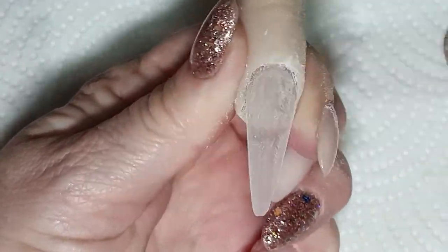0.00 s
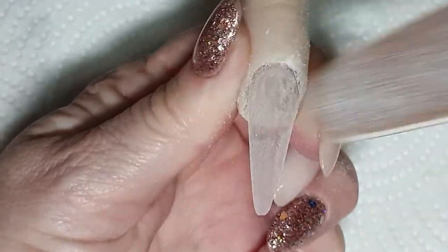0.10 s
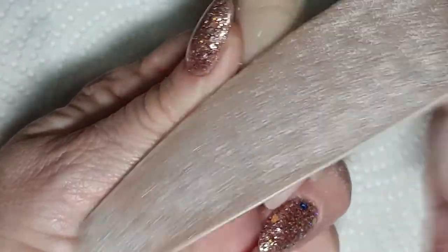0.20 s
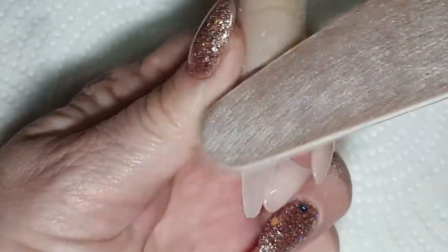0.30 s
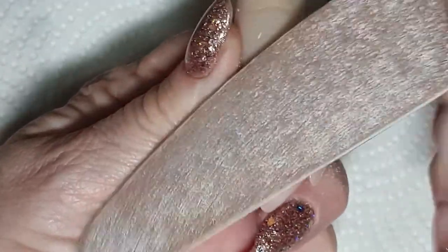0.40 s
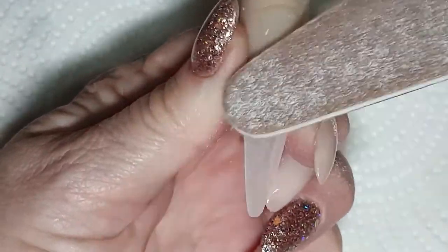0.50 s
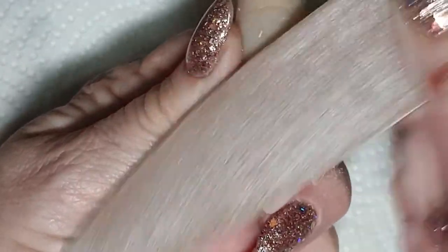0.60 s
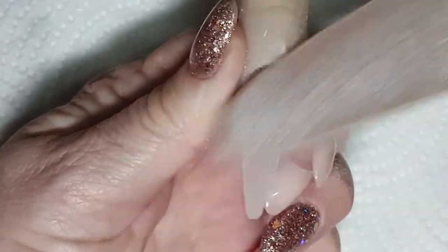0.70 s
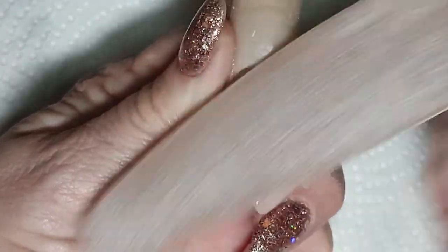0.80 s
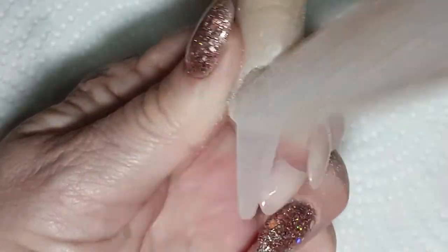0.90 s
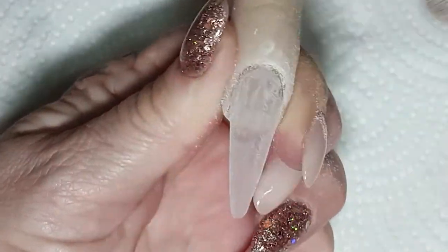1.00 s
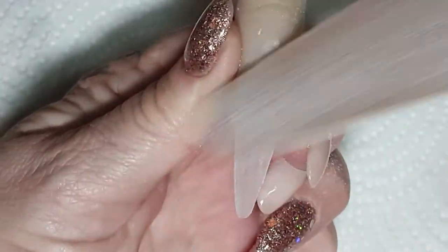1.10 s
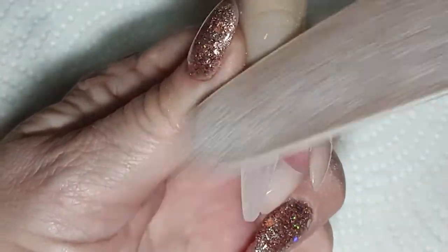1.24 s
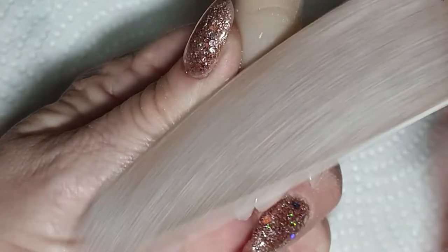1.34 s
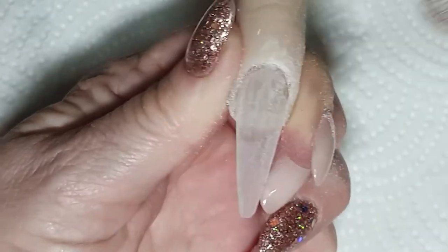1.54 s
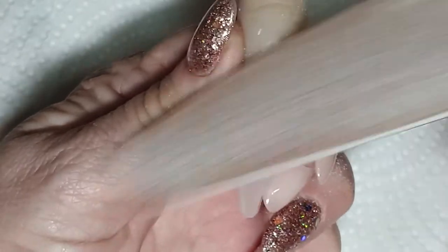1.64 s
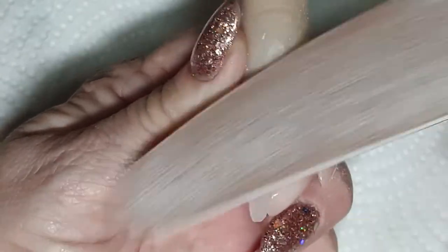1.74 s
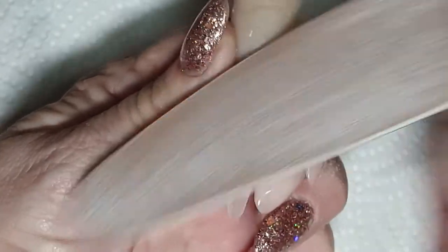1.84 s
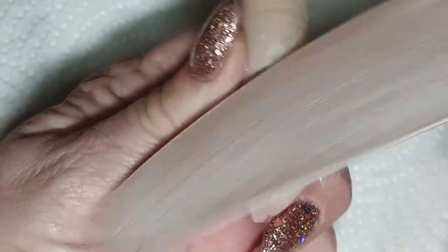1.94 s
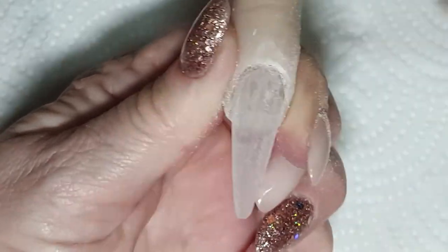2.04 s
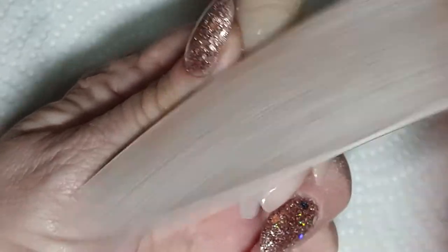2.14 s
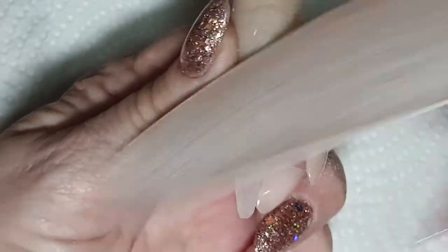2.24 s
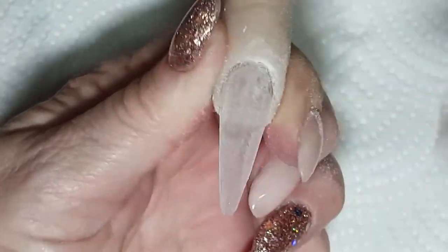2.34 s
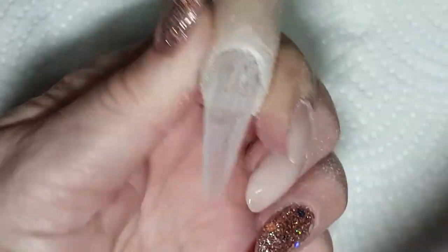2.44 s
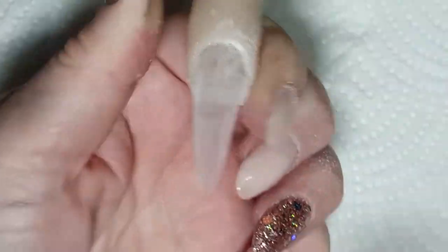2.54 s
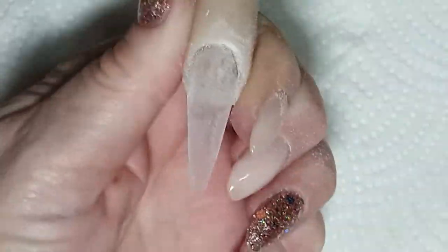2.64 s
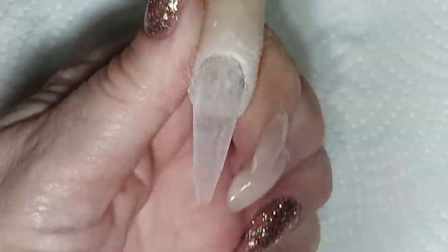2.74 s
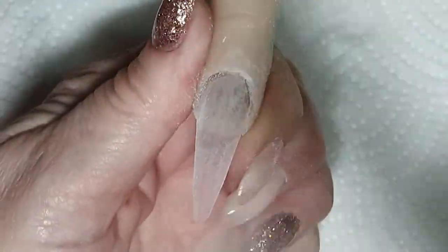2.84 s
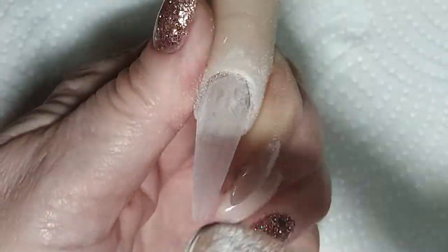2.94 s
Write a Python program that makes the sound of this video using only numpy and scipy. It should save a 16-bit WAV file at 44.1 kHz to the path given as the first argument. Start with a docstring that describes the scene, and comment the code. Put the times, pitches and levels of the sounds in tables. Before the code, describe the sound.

Close, bright, gritty nail filing in short fast bursts, ending with tiny clicks and a light sweep

```python
"""Small room, microphone close: a hand file rasps back and forth over a hard artificial nail.
Grit catches hiss and ring nail and blade; the file judders against the finger (low noise).
The end of a stroke opens; four bursts of strokes follow, then small clicks and two light sweeps.
Clicks are noise snaps through two resonances; a wavering hum, handling rumble and air lie beneath."""
import sys
import numpy as np
from scipy import signal
from scipy.fft import rfft, irfft, next_fast_len
from scipy.io import wavfile
from scipy.ndimage import uniform_filter1d

SR = 44100
rng = np.random.default_rng(int(sys.argv[2]) if len(sys.argv) > 2 else 0)


def materialize(psi):
    """Save the field psi as 16-bit PCM at rate SR to the path in sys.argv[1].

    A 1-D psi becomes a single channel; in a 2-D psi each row is a channel.
    """
    bounded = np.clip(np.atleast_2d(psi).T, -1, 1)
    quanta = np.round(bounded * 32767).astype(np.int16)
    wavfile.write(sys.argv[1], SR, quanta)


N = 130095

# Low hum contour before trims: (time [s], level [dB])
HUM_CONTOUR = [(0.0, -44), (0.08, -58.5), (0.48, -49), (0.53, -67), (0.94, -52), (1.11, -67), (1.32, -47),
               (1.4, -70), (1.73, -50), (2.13, -85), (2.22, -57), (2.95, -80)]
# Noise part of the hum: (frequency [Hz], relative gain [dB])
DRONE_SPECTRUM = [(20, -5), (40, -33), (58, 5), (75, -4), (110, -1), (250, -42.5)]
# Handling rumble contour before trim: (time [s], level [dB])
RUMBLE_CONTOUR = [(0.0, -47), (0.17, -73), (0.22, -52.5), (0.68, -52.5), (0.78, -44), (0.83, -51),
                  (0.98, -43.5), (1.1, -60), (1.78, -46), (1.83, -57.5), (2.05, -54.5), (2.17, -69),
                  (2.32, -51), (2.4, -53.5), (2.6, -49), (2.95, -54)]
# Handling rumble: (frequency [Hz], relative gain [dB])
RUMBLE_SPECTRUM = [(25, -29), (60, -2), (85, -8.5), (115, 7.5), (160, 0), (210, -9), (300, -3),
                   (500, -16.5), (1200, -28)]
# Room air: (frequency [Hz], relative gain [dB])
AIR_SPECTRUM = [(30, -12), (300, -2), (700, -25), (2000, -36), (8000, -20), (16000, -49)]
# Small hard clicks: (time [s], decay time constant [s], low-ring drive [dB], high-ring drive [dB])
CLICK_EVENTS = [(2.447, 0.0041, -36, -22), (2.4495, 0.0024, -20.5, -17), (2.453, .0008, -27, -23),
                (2.4697, 0.00063, -21, -41), (2.4827, 0.00073, -15.5, -19.5)]
# Light sweeps over the nail: (start [s], fastest [s], end [s], hiss level [dB], body level [dB])
LIGHT_SWEEPS = [(2.563, 2.629, 2.678, -31, -46.5), (2.646, 2.777, 2.94, -51, -65)]
# Sweep hiss: (frequency [Hz], relative gain [dB])
SWEEP_SPECTRUM = [(600, -17), (1400, -15.5), (2400, -10), (4000, -3.5), (8000, 0.5), (12000, -4),
                  (16000, -2.5)]
# File strokes, levels before speed and chatter: (start [s], fastest [s], end [s], landing speed [0-1],
# hiss level [dB], nail ring level [dB], nail ring frequency [Hz], blade level [dB], judder level [dB])
FILE_STROKES = [ (-.06, 0, 0.066, 0., -54, -46.5, 6500, -56.5, -61.5),
                (0.182, 0.236, 0.26, 0.32, -36, -36.5, 7040, -48.5, -49),
                (0.264, 0.326, 0.35, 0.04, -37.5, -36, 6100, -42.5, -41.5),
                (0.359, 0.418, .46, 0.04, -36, -33, 6400, -43.5, -44),
                (0.464, 0.519, 0.54, 0., -33.5, -33.5, 7000, -43, -38.5),
                (0.564, 0.615, 0.6724, 0.1, -33.5, -31.5, 7400, -43, -47),
                (.675, .718, 0.77, 0.14, -33.5, -30.5, 6940, -43.5, -36),
                (0.781, 0.839, .88, 0.06, -36.5, -31.5, 6560, -43, -45),
                (0.887, 0.938, 0.96, 0.27, -31, -29, 6870, -43.5, -38),
                (1.1437, 1.175, 1.215, 0.55, -36.5, -39, 8200, -53.5, -54),
                (1.219, 1.252, 1.313, 0., -38.5, -35, 7100, -45, -44.5),
                (1.319, 1.362, 1.415, 0.05, -36.5, -37.5, 6800, -46, -49),
                (1.42, 1.467, 1.511, 0.08, -34, -31, 6580, -41.5, -41),
                (1.671, 1.682, 1.715, 0.25, -37, -36, 7760, -46, -52.5),
                (1.736, 1.786, 1.817, 0.2, -42, -36.5, 6550, -46, -50.5),
                (1.831, 1.877, 1.938, 0., -42, -37.5, 6630, -46.5, -49.5),
                (1.943, 1.983, 2.04, 0.12, -34, -33.5, 6660, -44, -40.5),
                (2.191, 2.22, 2.263, 0.1, -34.5, -42.5, 8500, -43.5, -52),
                (2.266, 2.324, 2.369, 0.34, -31.5, -32.5, 7300, -43, -41.5)]
# Grit hiss: (frequency [Hz], relative gain [dB])
GRIT_SPECTRUM = [(600, -43), (1500, -21.5), (3000, -5.5), (3900, -1.5), (5000, 2), (7000, 2), (9500, 2.5),
                 (12500, 3), (14500, 1), (16000, -9)]
# File blade: (frequency [Hz], relative gain [dB])
BLADE_SPECTRUM = [(400, -20.5), (700, -10), (1100, -2), (1550, -7), (2100, 3.5), (2700, 6), (3300, -5),
                  (4000, -6)]
# Judder against the finger: (frequency [Hz], relative gain [dB])
JUDDER_SPECTRUM = [(70, -29), (160, -10), (230, -6.5), (290, 4.5), (350, -3), (430, -8.5), (560, -25.5),
                   (900, -37)]
# Left port over right port: (frequency [Hz], level difference [dB])
PORT_BALANCE = [(40, -10.5), (120, -2.5), (300, -2.5), (1000, -1.5), (2500, 1), (4000, 1), (6000, 3.5),
                (8200, -1.5), (10000, 1.5), (12000, 0), (16000, 0.5)]

HUM_HZ, HUM_TRIM_DB, DRONE_TRIM_DB, RUMBLE_TRIM_DB, AIR_DB = 58.7, -2.5, -3.5, 0.5, -68
ROOM_HIGH_DB, ROOM_LOW_DB, ROOM_LOW_APART_DB = -7.5, -3, -10.5
ROOM_HIGH_T60_S, ROOM_LOW_T60_S, ROOM_SPLIT_HZ = 0.35, 0.27, 510
PORT_LAG_S, SCATTER_DB, SCATTER_FROM_HZ = 0.00009, 5, 830
SHIMMER_DB, SHIMMER_S, SHIMMER_WIDTH_HZ, RIPPLE_DB = 4, 0.04, 350, 2
CLICK_LOW_HZ, CLICK_LOW_WIDTH_HZ = 4600, 3140
CLICK_HIGH_HZ, CLICK_HIGH_WIDTH_HZ = 12500, 3300
SPEED_POWER, TREBLE_POWER, BODY_POWER = 0.95, 1.28, 0.53
GRAINS_PER_S, GRAIN_SPREAD_DB = 16000, 3.5
RING_WIDTH_HZ = 4260
CHATTER_DB, CHATTER_HZ, FLUTTER_DB, FLUTTER_HZ = 0.46, 229.9, 2, 63
HOLLOW_HZ, HOLLOW_WIDTH_HZ, HOLLOW_DEPTH = 4075, 490, 0.47
TOP_HZ = 16000


def undb(db):
    """Decibels to gain."""
    return 10 ** (np.asarray(db) / 20)


def unit(x):
    """Scale to rms 1."""
    return x / np.sqrt(np.mean(x ** 2))


def freqs():
    """Frequency of every spectral bin [Hz], at least 1."""
    return np.maximum(np.fft.rfftfreq(next_fast_len(N + SR // 2), 1 / SR), 1)


def spectrum(x):
    """Zero-padded spectrum."""
    return rfft(x, next_fast_len(N + SR // 2))


def shape(x, gain):
    """Filter by a gain for every bin."""
    return irfft(spectrum(x) * gain, next_fast_len(N + SR // 2))[..., :N]


def colour(points):
    """Gain through (Hz, dB) points, interpolated over log frequency."""
    hz, db = np.array(points, float).T
    return undb(np.interp(np.log(freqs()), np.log(hz), db))


def resonance(hz, width_hz):
    """Steep resonance: a band-pass applied twice."""
    f = freqs()
    return 1 / (1 + 1j * (f * f - hz * hz) / (f * width_hz)) ** 2


def noise(gain):
    """Coloured noise of rms 1."""
    return unit(shape(rng.standard_normal(N), gain))


def walk(rate_hz):
    """Smooth random wander with spread 1."""
    hold = int(SR / rate_hz)
    steps = np.repeat(rng.standard_normal(N // hold + 1), hold)[:N]
    return unit(uniform_filter1d(steps, hold))


def wide(points):
    """Low noise that is mostly alike at both ports."""
    shared = noise(colour(points))
    apart = np.array([noise(colour(points)) for _ in range(2)])
    return unit(shared + undb(-6) * apart)


def background():
    """A wavering low hum, handling rumble and faint room air."""
    t = np.arange(N) / SR
    hz = HUM_HZ * (1 + 0.016 * walk(6.5))
    tone = np.sqrt(2) * np.sin(2 * np.pi * np.cumsum(hz) / SR)
    hum = undb(HUM_TRIM_DB) * tone + undb(DRONE_TRIM_DB) * wide(DRONE_SPECTRUM)
    hum = undb(np.interp(t, *np.array(HUM_CONTOUR).T)) * hum
    rumble_db = np.interp(t, *np.array(RUMBLE_CONTOUR).T) + RUMBLE_TRIM_DB
    rumble = undb(rumble_db) * wide(RUMBLE_SPECTRUM)
    air = np.array([noise(colour(AIR_SPECTRUM)) for _ in range(2)])
    return hum + rumble + undb(AIR_DB) * air


def room(x):
    """A short diffuse tail; its bass is much alike on both sides and dies sooner."""
    t = np.arange(SR // 2) / SR

    def tail(t60_s, channels):
        """Spectrum of decaying noise with a soft onset and unit energy."""
        envelope = np.exp(-np.log(1000) * t / t60_s) * (1 - np.exp(-t / 0.0036))
        h = rng.standard_normal((channels, len(t))) * envelope
        return spectrum(h / np.sqrt(np.sum(h ** 2, axis=1, keepdims=True)))

    low = 1 / (1 + (freqs() / ROOM_SPLIT_HZ) ** 2)
    bass = tail(ROOM_LOW_T60_S, 1) + undb(ROOM_LOW_APART_DB) * tail(ROOM_LOW_T60_S, 2)
    treble = tail(ROOM_HIGH_T60_S, 2)
    return shape(x, undb(ROOM_LOW_DB) * low * bass + undb(ROOM_HIGH_DB) * (1 - low) * treble)


def shimmer(x, size=256):
    """Near reflections as random ripple: part stays, part shifts as the contact moves along the file."""
    f, t, cells = signal.stft(x, SR, nperseg=size)
    moving = uniform_filter1d(rng.standard_normal(cells.shape), int(SHIMMER_S / t[1]), axis=1)
    moving = unit(uniform_filter1d(moving, int(SHIMMER_WIDTH_HZ / f[1]), axis=0))
    still = rng.standard_normal((len(f), 1))
    gain = undb(SHIMMER_DB * moving + RIPPLE_DB * still)
    gain /= np.sqrt(uniform_filter1d(gain ** 2, size=16, axis=0))  # hold the local band level
    return signal.istft(cells * gain, SR, nperseg=size)[1][:N]


def ports(source):
    """Two ports share direct sound, the right later; treble scattered by the hands is unrelated at each."""
    f = freqs()
    share = undb(SCATTER_DB) * f ** 2 / (f ** 2 + SCATTER_FROM_HZ ** 2)
    whole = np.sqrt(1 + share ** 2)  # keeps total power
    lag = np.exp(-2j * np.pi * f * np.array([[0], [PORT_LAG_S]]))
    direct = shape(source(), lag / whole)
    scattered = np.array([shimmer(source()) for _ in range(2)])
    return direct + shape(scattered, share / whole)


def clicks():
    """Very short noise snaps ring two resonances of hard plastic, heard directly at each port."""
    t = np.arange(N) / SR
    low, high = np.zeros(N), np.zeros(N)
    for at_s, decay_s, low_db, high_db in CLICK_EVENTS:
        snap = (t >= at_s) * np.exp(-np.abs(t - at_s) / decay_s)
        low += undb(low_db) * snap
        high += undb(high_db) * snap
    low_ring = shape(low * rng.standard_normal((2, N)), resonance(CLICK_LOW_HZ, CLICK_LOW_WIDTH_HZ))
    high_ring = shape(high * rng.standard_normal((2, N)), resonance(CLICK_HIGH_HZ, CLICK_HIGH_WIDTH_HZ))
    return low_ring + high_ring


def speed(start_s, fastest_s, end_s, landing=0):
    """Stroke samples and relative hand speed: up, then down to the turn; it may land already moving."""
    on = np.arange(max(int(start_s * SR), 0), min(int(end_s * SR), N))
    phase = np.interp(on / SR, [start_s, fastest_s, end_s], [0, .5, 1])
    swing = (4 * phase * (1 - phase)) ** SPEED_POWER
    return on, swing + landing * (1 - swing) * (phase < .5)


def sweeps():
    """Smooth bright strokes with little weight: hiss and weak body noise follow hand speed."""
    hiss, body = noise(colour(SWEEP_SPECTRUM)), noise(colour(BLADE_SPECTRUM))
    out = np.zeros(N)
    for start_s, fastest_s, end_s, hiss_db, body_db in LIGHT_SWEEPS:
        on, v = speed(start_s, fastest_s, end_s)
        out[on] += v * (undb(hiss_db) * hiss[on] + undb(body_db) * body[on])
    return out


def grit():
    """Dense tiny catches of uneven size at random instants."""
    caught = rng.random(N) < GRAINS_PER_S / SR
    size = undb(GRAIN_SPREAD_DB * rng.standard_normal(N))
    return caught * rng.standard_normal(N) * size


def ringing(x, hz):
    """The nail's broad resonance, applied twice, scaled to rms 1."""
    b, a = signal.iirpeak(hz, hz / RING_WIDTH_HZ, fs=SR)
    once = signal.lfilter(b, a, x)
    return unit(signal.lfilter(b, a, once))


def filing():
    """Grit hisses, rings nail and blade; the file judders on the finger; a notch hollows the tone."""
    hiss = unit(shape(grit(), colour(GRIT_SPECTRUM)))
    blade = unit(shape(grit(), colour(BLADE_SPECTRUM)))
    judder = noise(colour(JUDDER_SPECTRUM)) * undb(FLUTTER_DB * walk(FLUTTER_HZ))
    catches = grit()
    out = np.zeros(N)
    for start_s, fastest_s, end_s, landing, hiss_db, ring_db, ring_hz, blade_db, judder_db in FILE_STROKES:
        on, v = speed(start_s, fastest_s, end_s, landing)
        treble = undb(hiss_db) * hiss[on] + undb(ring_db) * ringing(catches[on], ring_hz)
        body = undb(blade_db) * blade[on] + undb(judder_db) * unit(judder[on])
        out[on] += v ** TREBLE_POWER * treble + v ** BODY_POWER * body
    chattering = out * undb(CHATTER_DB * walk(CHATTER_HZ))
    hollow = 1 - HOLLOW_DEPTH * np.exp(-(2 * (freqs() - HOLLOW_HZ) / HOLLOW_WIDTH_HZ) ** 2)
    return shape(chattering, hollow)


def scraping():
    """File strokes and light sweeps together."""
    return filing() + sweeps()


def scene():
    """The work at the nail, its room and the background."""
    near = ports(scraping) + clicks()
    return near + room(near) + background()


def record(dry):
    """Each port has its own colour; the top is cut steeply."""
    tilt = np.sqrt(colour(PORT_BALANCE))  # half the difference to each port
    lowpass = signal.ellip(10, .2, 80, TOP_HZ, fs=SR, output="sos")
    return signal.sosfilt(lowpass, shape(dry, np.array([tilt, 1 / tilt])))


dry = scene()
out = record(dry)
materialize(out)
```